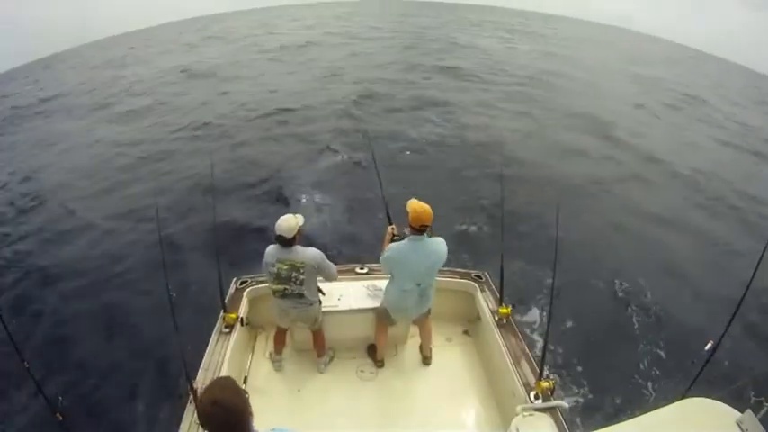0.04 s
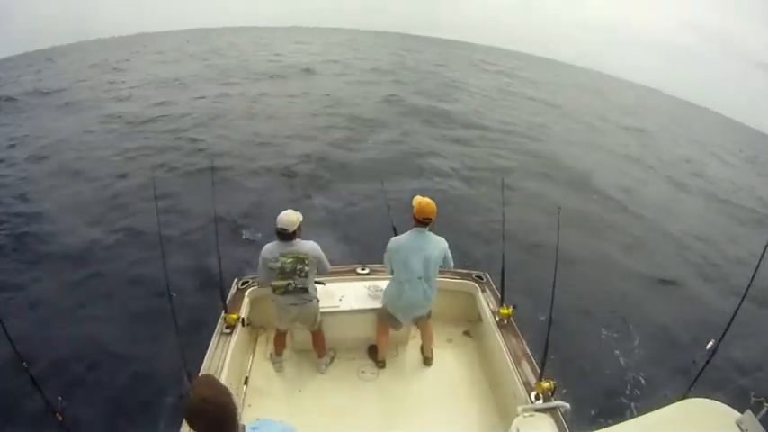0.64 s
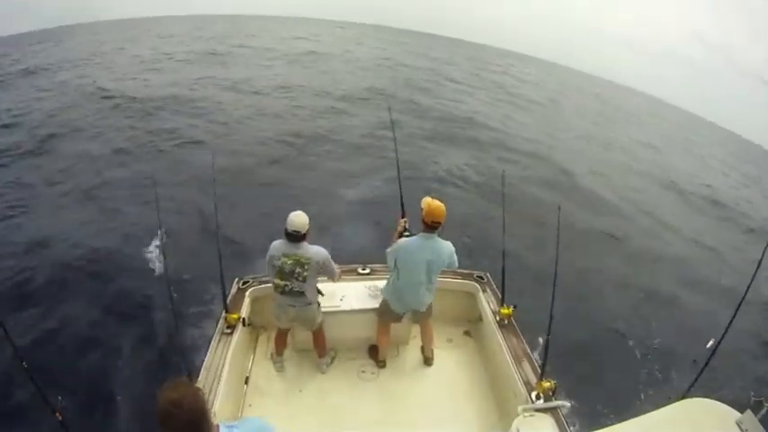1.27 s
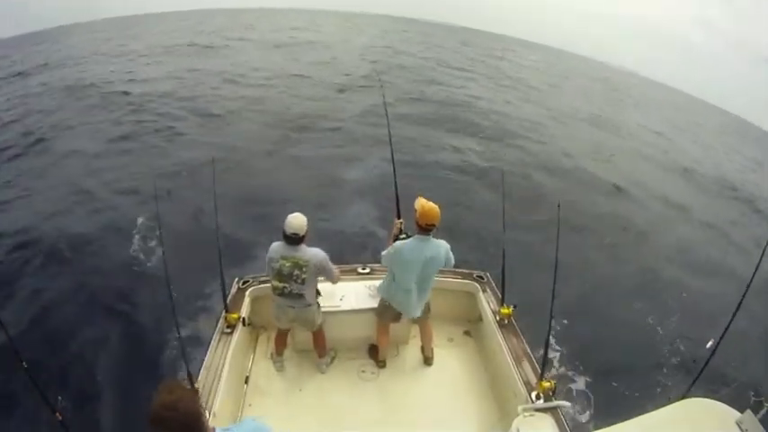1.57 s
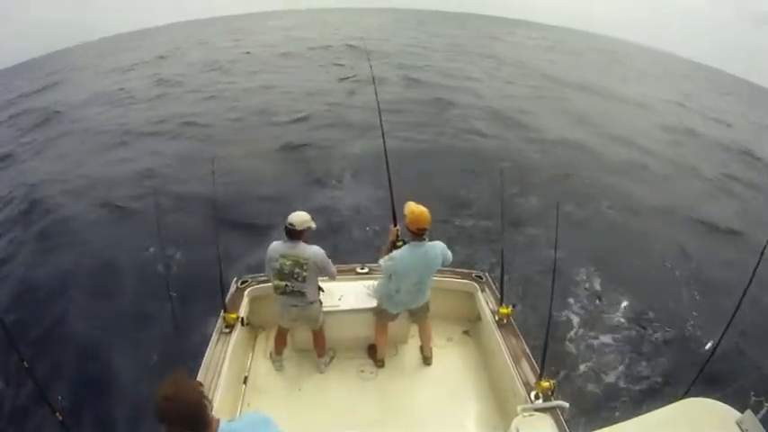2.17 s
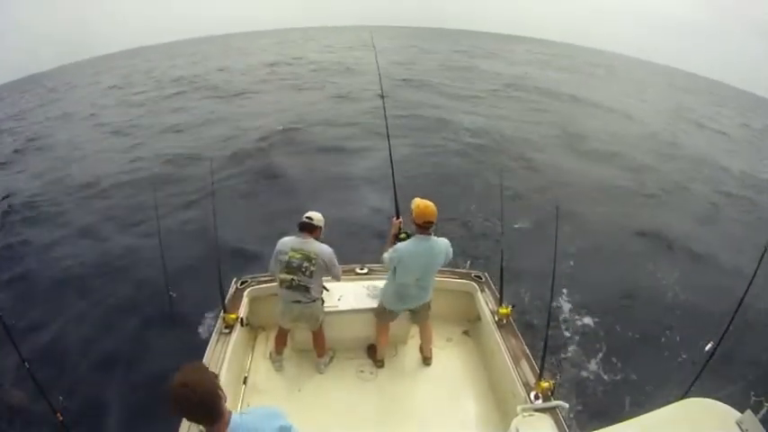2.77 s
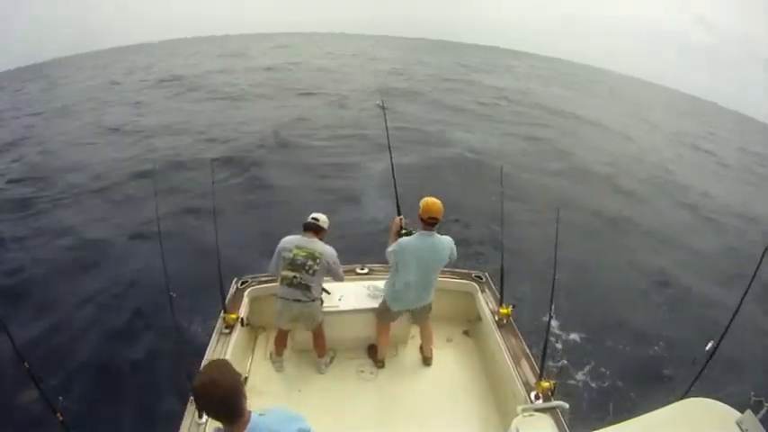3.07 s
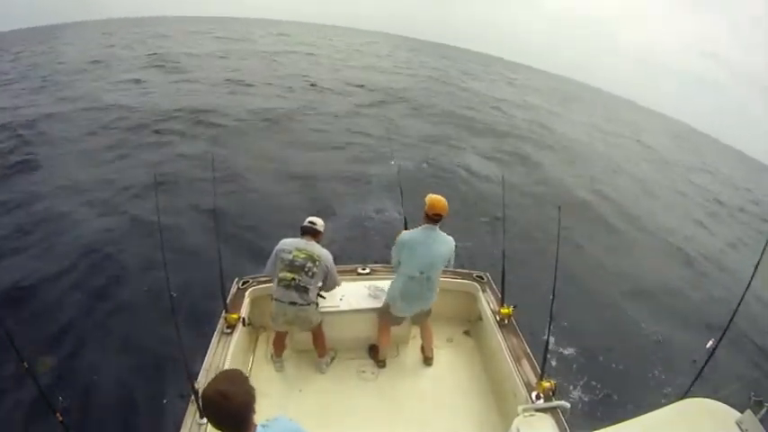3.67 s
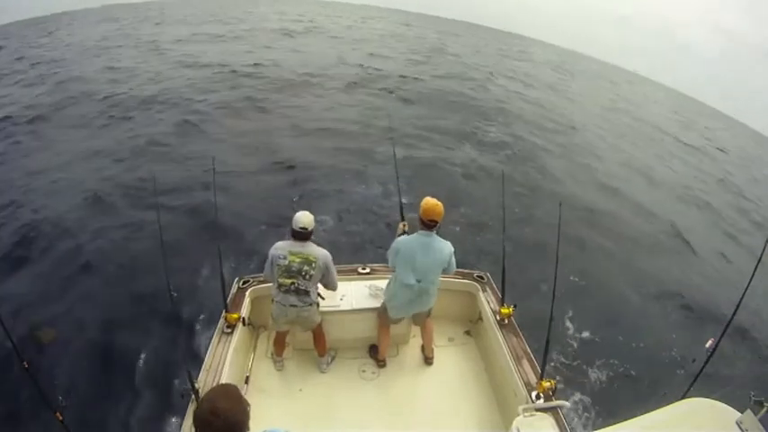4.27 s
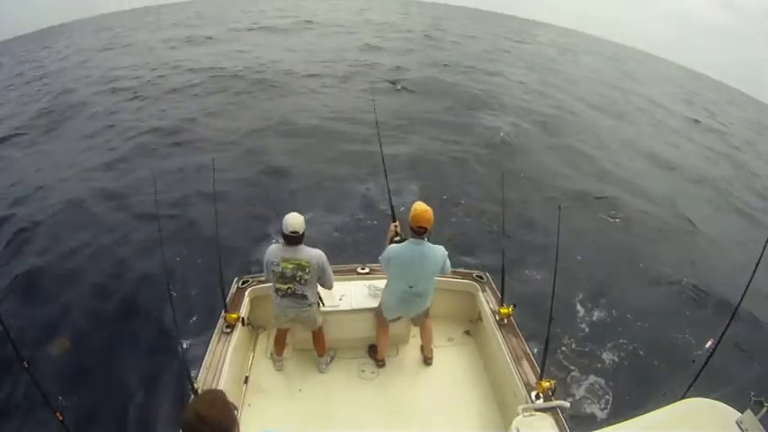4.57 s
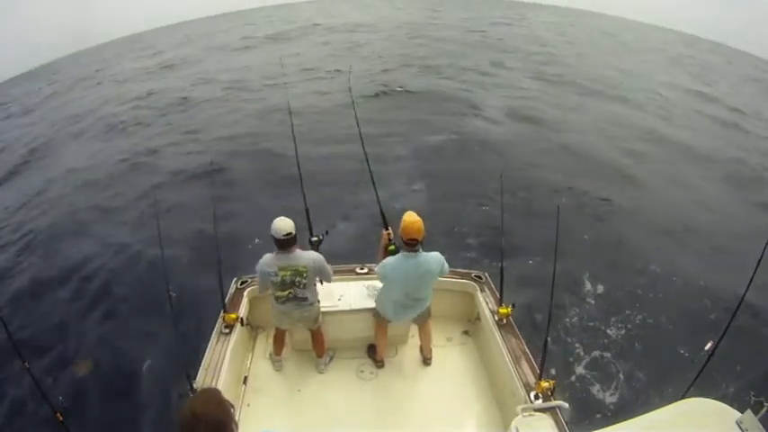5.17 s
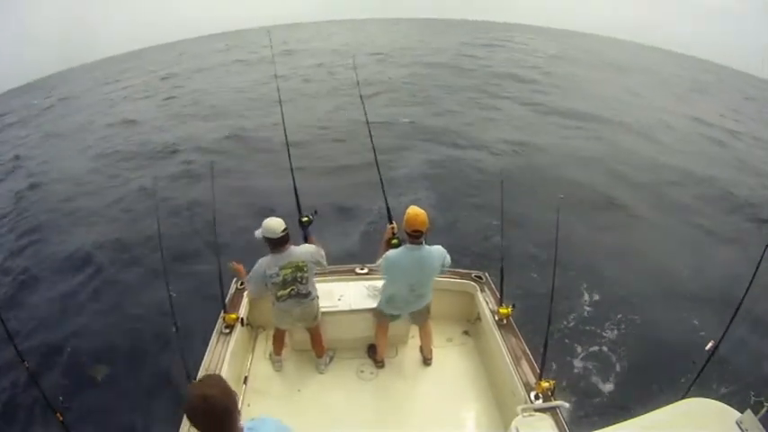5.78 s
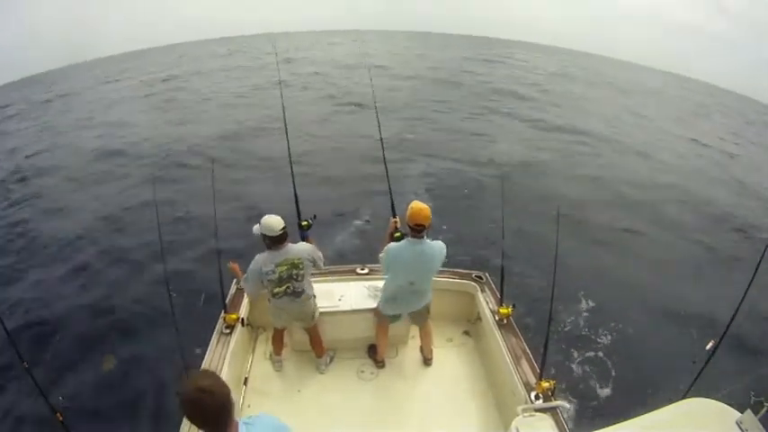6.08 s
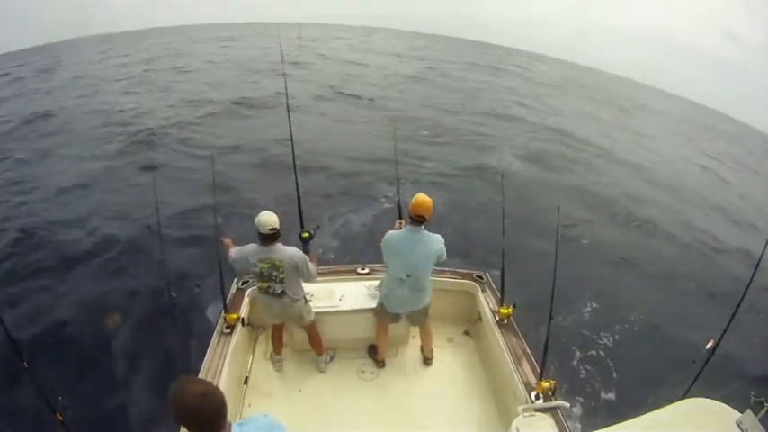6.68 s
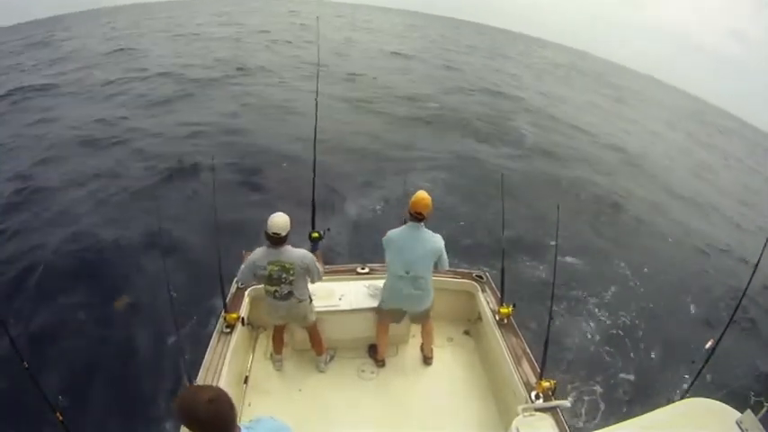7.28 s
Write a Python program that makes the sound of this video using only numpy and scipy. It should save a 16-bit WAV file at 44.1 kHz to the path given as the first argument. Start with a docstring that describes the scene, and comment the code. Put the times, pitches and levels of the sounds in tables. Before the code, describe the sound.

Boat engines drone and throb with small rattles and knocks, over a muffled rush of wind and sea.

```python
"""A fishing boat idling on a swell

Heard from inside a sealed camera housing fixed high on the boat's frame. Two engines drone and
beat slowly against each other; their shaking makes the mount knock, the case tick and a fitting ping.
Wind and sea come through the case as a muffled rush, with hiss, drops of spray and one slop of a wave.
A coarse sample-and-hold adds a thin glassy edge."""
import sys
import numpy as np
from scipy import signal
from scipy.fft import rfft, irfft, next_fast_len
from scipy.io import wavfile
from scipy.ndimage import uniform_filter1d

SR = 44100
rng = np.random.default_rng(int(sys.argv[2]) if len(sys.argv) > 2 else 0)


def to_wav(s):
    """Save 16-bit WAV."""
    ch = np.atleast_2d(s).T  # columns
    pcm = np.round(np.clip(ch, -1, 1) * 32767)  # PCM
    wavfile.write(sys.argv[1], SR, pcm.astype(np.int16))


N = 332053
TIME = np.arange(N) / SR


def gain_of(db):
    """Turns decibels into a multiplier."""
    return 10 ** (np.asarray(db) / 20)


def evened(x):
    """Scales x to an average (rms) level of 1."""
    return x / np.sqrt(np.mean(x ** 2) + 1e-20)


def coloured(x, tone):
    """Filters x by a table of frequencies and levels, then evens it."""
    hz, db = np.transpose(tone)
    size = next_fast_len(N, True)
    f = np.fft.rfftfreq(size, 1 / SR)
    gain = gain_of(np.interp(np.log(f + 1), np.log(hz), db))
    return evened(irfft(rfft(x, size) * gain, size)[:N])


def steadied(x, size):
    """Holds the power of x near 1 over stretches of `size` samples."""
    power = uniform_filter1d(uniform_filter1d(x ** 2, size), size)
    return x / np.sqrt(abs(power) + 1e-12)


def add(mix, s, sound):
    """Mixes a sound in at s seconds."""
    part = mix[max(round(s * SR), 0):][:len(sound)]
    part += sound[:len(part)]


def swells(rows):
    """Adds up bell-shaped bumps, one per row, into a curve for each level column."""
    s, width, *heights = np.transpose(rows)
    t = TIME[::100]
    bells = np.exp(-(2 * (t - s[:, None]) / width[:, None]) ** 2)
    return [np.interp(TIME, t, h @ bells) for h in heights]


def spell(start, end, rise_s, fall_s):
    """Fades in before start, holds until end, then fades out."""
    return np.exp(np.minimum(TIME - start, 0) / rise_s - np.maximum(TIME - end, 0) / fall_s)


def drift(step_s):
    """A smooth random wobble that changes about once per step."""
    t = TIME[::100]
    f = np.fft.rfftfreq(len(t), t[1])
    keep_slow = np.exp(-(2 * f * step_s) ** 2) * (f > 0)
    wobble = irfft(rfft(rng.standard_normal(len(t))) * keep_slow, len(t))
    return np.interp(TIME, t, evened(wobble))


def strike(modes, levels_db, splits_hz, scrape, scrape_s, rise_cycles):
    """A tap and brief scrape ring a part's modes (its own notes); each pitch band gets its own level."""
    t = np.arange(SR // 10) / SR
    hz, db, ring_s = np.transpose(modes)[:, :, None]
    detune = 1 + 0.0091 * rng.standard_normal(hz.shape)
    rings = gain_of(db - 60 * t / ring_s) * np.sin(2 * np.pi * hz * detune * t)
    rings *= 1 - np.exp(-t * hz / rise_cycles)  # low notes take longer to build
    force = rng.standard_normal(len(t)) * np.exp(-t / scrape_s)
    force *= scrape / np.linalg.norm(force)
    force[0] += 1  # the tap
    rings = signal.fftconvolve(force[None], rings, axes=1)[:, :len(t)]
    band = np.searchsorted(splits_hz, hz[:, 0])
    return sum(gain_of(level) * evened(rings[band == k].sum(0)) for k, level in enumerate(levels_db))


# Surges as the engines fall into step: (middle [s], width [s], drone lift [dB], boom lift [dB])
ENGINE_SURGES = [(0.15, 0.35, 11, 9), (0.81, 0.46, 10, 8.5), (1.7, 0.56, 6, 10), (2.44, 0.43, 12, 9),
                 (3.31, 0.5, 11, 8), (3.89, 0.25, 5, 7.5), (4.33, 0.32, 9.5, 10.5), (4.56, 0.1697, 6, 15.5),
                 (4.86, 0.319, -2, 10.5), (5.17, 0.46, 11, 7.5), (6.03, 0.43, 9.5, 9.5),
                 (6.93, 0.53, 11, 10), (7.33, 0.13, 7, -3), (7.5, 0.14, -1.5, 6.5)]
# The deep hum swells and cancels: (middle [s], width [s], change [dB])
HUM_SWELLS = [(0.36, 0.19, 4.5), (0.54, 0.083, -7), (0.77, 0.12, 2.5), (1.21, 0.14, -26), (1.5, 0.24, 6),
              (2.05, 0.17, -4), (2.85, 0.12, -9), (3.72, 0.13, -5), (4.5, 0.13, 2), (4.8, 0.3, -10.5),
              (5.96, 0.24, 10.5), (6.92, 0.22, -17), (7.2, 0.3, 4)]
# Tone of the low throb and of the boom above it: (frequency [Hz], relative level [dB])
THROB_SPECTRUM = [(27, -16), (40, -22.5), (62, 3.5), (84, 7), (102, 5.5), (120, 4), (131, -7), (146, 1),
                  (162, -15.5), (190, -60)]
BOOM_SPECTRUM = [(140, -23.5), (163, -10.5), (174, -5), (198, 3.5), (225, -5), (258, -11.5), (283, -17.5),
                 (305, -28.5), (360, -80.5)]


def engines(turns, other_turns):
    """Tones at multiples of shaft speed: low ones clean, higher ones roughened by wind and exhaust."""
    def harmonic(k, shaft):
        return np.sqrt(2) * np.cos(2 * np.pi * (k * shaft + rng.random()))

    drone_lift, boom_lift = swells(ENGINE_SURGES)
    hum_db = -29 + swells(HUM_SWELLS)[0] + 2 * drift(0.1)
    drone_db = -32 + drone_lift + 2 * drift(0.068)
    throb_db = -31 + 0.42 * boom_lift + 2.4 * drift(0.043)
    boom_db = -41 + 0.93 * boom_lift + 2 * drift(0.043)
    out = gain_of(-42) * harmonic(0.98, turns)
    out += gain_of(hum_db) * harmonic(2, turns)
    out += gain_of(drone_db) * harmonic(3, other_turns)
    for tone, db, rough in (THROB_SPECTRUM, throb_db, 0.6), (BOOM_SPECTRUM, boom_db, 0.46):
        firing = sum(0.43 * harmonic(k, turns) + harmonic(k, other_turns) for k in range(4, 13))
        buffeting = coloured(rng.standard_normal(N), tone)
        blend = (1 - rough) * coloured(firing, tone) + rough * buffeting
        out += gain_of(db) * steadied(blend, size=3000)
    return out


def shaft_turns(speeds_hz=(25.04, 24.595), sag_hz_per_db=0.04, wander_hz=0.45):
    """Counts each engine's turns; the speed wanders and drops a little in a surge."""
    sag_hz = sag_hz_per_db * swells(ENGINE_SURGES)[0]
    return [np.cumsum(hz - sag_hz + wander_hz * drift(0.25)) / SR for hz in speeds_hz]


# The rush before surges lift it: (time [s], hollow body level [dB], upper wash level [dB])
RUSH_LEVELS = [(0, -55.5, -56), (0.6, -55.5, -59), (1.3, -56.5, -59), (2.1, -55.5, -58.5),
               (2.55, -57.5, -55), (2.9, -58, -61.5), (3.4, -57.5, -59), (4.05, -55, -63.5),
               (4.95, -56, -58.5), (5.6, -60, -62), (6.15, -57, -57.5), (6.4, -57.5, -60.5),
               (6.7, -55, -61), (7.5, -59.5, -60.5)]
# Tone of the body, the wash and a steady background: (frequency [Hz], relative level [dB])
BODY_SPECTRUM = [(150, -34.5), (330, -5), (470, -4), (560, -2), (660, 5), (720, -1.5), (820, -6),
                 (930, -33), (1200, -67.5)]
WASH_SPECTRUM = [(700, -5), (1050, 6.5), (1300, -0.5), (1600, -1), (2150, 5), (2600, 1.5), (3100, -24.5),
                 (3600, -7), (4200, -17.5), (6000, -13)]
BACKGROUND_SPECTRUM = [(300, -9), (1500, 1), (3500, 2.5), (4600, -0.5), (6000, -12.5)]


def rush(turns, flutter_db=2):
    """Sea and wind come through the case, fluttering with each turn of an engine."""
    flutter = gain_of(flutter_db * np.cos(2 * np.pi * turns))
    body_db, wash_db = rush_levels()
    out = gain_of(-68) * coloured(rng.standard_normal(N), BACKGROUND_SPECTRUM)
    for db, tone in (body_db + 1, BODY_SPECTRUM), (wash_db, WASH_SPECTRUM):
        out += gain_of(db) * coloured(rng.standard_normal(N) * flutter, tone)
    return out


def rush_levels():
    """Body and wash levels in dB, lifted a little by each surge."""
    s, body_db, wash_db = np.transpose(RUSH_LEVELS)
    lift = swells(ENGINE_SURGES)[1]
    return np.interp(TIME, s, body_db) + 0.19 * lift, np.interp(TIME, s, wash_db) + 0.12 * lift


def water_noise(tone, grain_db=2.5):
    """Noise whose level flickers quickly, so it sounds grainy."""
    flicker = evened(uniform_filter1d(rng.standard_normal(N), size=200))
    return coloured(gain_of(grain_db * flicker) * rng.standard_normal(N), tone)


# Spells of hiss: (start [s], end [s], level [dB])
HISS_SPELLS = [(-0.1, 0.298, -62), (2.81, 3.15, -65), (3.2, 3.52, -64), (3.8, 3.82, -69), (5.928, 6.4, -64),
               (6.45, 6.827, -66.5)]
# Tone of the hiss: (frequency [Hz], relative level [dB])
HISS_SPECTRUM = [(2500, -30), (3600, -16.5), (3850, 1.5), (3980, 7), (4150, -9), (4450, -3), (4650, -2.5),
                 (4900, -2.5), (5280, 0), (5550, -3.5), (6000, -21)]


def spray_hiss(rise_s=0.059, fall_s=0.19):
    """Spray makes a thin hiss that comes and goes."""
    spells = [gain_of(db) * spell(start, end, rise_s, fall_s) for start, end, db in HISS_SPELLS]
    return np.max(spells, axis=0) * water_noise(HISS_SPECTRUM)


# Notes of the mount and the case: (frequency [Hz], relative level [dB], time to fade 60 dB [s])
MOUNT_MODES = [(240.7, 2.5, 0.15), (568, -12.5, 0.15), (655, 6.5, 0.059), (782, 0.5, 0.049),
               (1036, -6.5, 0.058), (1174, -1.5, 0.026), (1760, -1.5, 0.032), (2094, -6, 0.052),
               (2310, 4, 0.02), (2515, -1.5, 0.027), (3470, -15, 0.029)]
CASE_MODES = [(810, 7.5, 0.016), (1309, 9.5, 0.018), (1460, 2.5, 0.016), (2064, -5, 0.017),
              (2533, 2.5, 0.0096), (2700, -15.5, 0.017), (3540, 6, 0.018), (3610, -11, 0.049)]


def chatter(turns, case_share=0.39, spread_db=4):
    """Each engine turn faintly taps the case or the mount, harder when the rush is loud."""
    out = np.zeros(N)
    body_db, wash_db = rush_levels()
    turn_starts = np.flatnonzero(np.diff(np.floor(turns)))
    for i, (late, pick, force) in zip(turn_starts, rng.random((len(turn_starts), 3))):
        if pick < case_share:
            modes, db, split_hz = CASE_MODES, wash_db[i] - 9, 3100
        else:
            modes, db, split_hz = MOUNT_MODES, body_db[i] - 7, 900
        db += spread_db * (2 * force - 1)
        bands_db = (db, db - 10)  # a soft tap barely wakes the high notes
        tap = strike(modes, bands_db, [split_hz], scrape=1, scrape_s=0.0087, rise_cycles=0.23)
        add(out, i / SR + 0.03 * late, tap)
    return out


# Sharp ticks: (time [s], middle ring level [dB], tilt toward the high ring [dB])
CASE_TICKS = [(0.142, -55.5, -10), (0.262, -64, 1), (0.4028, -59, -3), (0.4473, -66, -3),
              (0.5211, -59.5, -8), (0.601, -66.5, 2), (0.888, -68, 14), (1.0328, -67, -6),
              (1.8609, -55.5, -7), (2.1999, -63.5, -12.5), (2.2315, -62, -5.5), (2.603, -59, -4),
              (2.6124, -61.5, -7), (2.6516, -63, 4), (2.6729, -52.5, 8.5), (2.7028, -64.5, -13),
              (2.751, -56.5, 6.5), (2.7899, -55, 6), (2.828, -65.5, -1), (2.8813, -58, 3),
              (2.9284, -53.5, 3), (2.9871, -52.5, 1), (3.0012, -59, -5.5), (3.197, -67, 5),
              (3.4905, -64.5, 0), (4.0634, -58.5, 3), (4.6163, -68.5, -11), (4.9704, -68, -6),
              (4.9866, -66, -11), (5.1436, -59.5, -4), (5.1551, -54, -7), (5.2031, -57.5, -4.5),
              (5.242, -54.5, -4), (5.294, -55, -6), (5.5054, -62, 4), (5.5398, -61, -7),
              (5.7772, -54.5, -5.5), (5.8093, -65, -8), (5.8355, -62, 4), (6.018, -60, 5),
              (6.068, -59.5, 15), (6.1447, -65, -4), (7.427, -65, -10)]


def case_ticks():
    """The case is shaken against its stops and rings very briefly."""
    out = np.zeros(N)
    for s, db, tilt in CASE_TICKS:
        bands_db = (db - 1.5 - tilt, db, db - 3 + 0.26 * tilt)
        tick = strike(CASE_MODES, bands_db, (1750, 3100), scrape=0.63, scrape_s=0.0036, rise_cycles=3.2)
        add(out, s, tick)
    return out


# Dull knocks, before their boost: (time [s], count, body level [dB], bright ring level [dB])
MOUNT_KNOCKS = [(0.446, 1, -49.5, -53), (0.61, 1, -51.5, -57), (0.79, 1, -54, -64), (1.113, 1, -55, -63.5),
                (1.271, 1, -54, -62), (1.843, 1, -51, -64), (2.367, 1, -65, -63), (2.395, 1, -55.5, -59.5),
                (2.527, 1, -40, -56.5), (2.95, 1, -53, -67), (3.222, 1, -56, -66), (3.252, 1, -53.5, -57.5),
                (3.32, 3, -62, -72), (3.779, 3, -54, -67.5), (4.714, 1, -51.5, -61.5),
                (4.753, 3, -46.5, -58), (4.896, 2, -47.5, -63), (5.023, 1, -42, -54),
                (5.098, 1, -46.5, -70), (5.194, 1, -48.5, -63), (6.217, 1, -52.5, -62),
                (6.258, 2, -56, -73), (6.584, 1, -56.5, -70), (6.645, 3, -55, -72)]


def mount_knocks(gap_s=0.039, boost_db=3):
    """The mount hits its stops, once or in a run about one engine turn apart."""
    out = np.zeros(N)
    for s, count, body_db, bright_db in MOUNT_KNOCKS:
        bands_db = (body_db + 2, body_db, bright_db)
        for k in range(round(count)):
            knock = strike(MOUNT_MODES, bands_db, (400, 1500), scrape=0.83, scrape_s=0.01, rise_cycles=3)
            add(out, s + k * gap_s, gain_of(boost_db) * knock)
    return out


# Drops of spray: (time [s], level [dB])
SPRAY_DROPS = [(0.5219, -40), (1.862, -44), (3.0022, -45), (3.9099, -46), (4.473, -38), (4.642, -48),
               (5.7777, -43)]


def spray_drops(fade_s=0.0065):
    """Each drop hits the case with a tiny burst of bright noise."""
    out = np.zeros(N)
    t = np.arange(SR // 40) / SR
    for s, db in SPRAY_DROPS:
        bright_noise = np.diff(rng.standard_normal(len(t) + 1))
        add(out, s, gain_of(db) * bright_noise * np.exp(-t / fade_s))
    return out


# Notes of the fitting: (frequency [Hz], relative level [dB], time to fade 60 dB [s])
FITTING_MODES = [(1794, -20, 0.027), (2090, 13, 0.027), (2218.7, -6, 0.059)]
# Its pings: (time [s], level [dB])
FITTING_PINGS = [(3.371, -62), (3.401, -61), (4.021, -56), (4.0498, -44.5), (4.102, -46.5), (6.185, -61.5)]


def fitting_pings():
    """A loose metal fitting rings when it is shaken against its stop."""
    out = np.zeros(N)
    for s, db in FITTING_PINGS:
        add(out, s, strike(FITTING_MODES, [db], [], scrape=0.2, scrape_s=0.0022, rise_cycles=2))
    return out


# Tone of the slop: (frequency [Hz], relative level [dB])
SLOP_SPECTRUM = [(300, 0), (700, 3), (1500, 2), (2500, 7), (3500, -0.5), (4600, -3), (6000, -13.5)]


def wave_slop(at_s=4.478, level_db=-46):
    """One wave slops against the hull in a short splash."""
    return gain_of(level_db) * spell(at_s, at_s, rise_s=0.016, fall_s=0.035) * water_noise(SLOP_SPECTRUM)


# Gaps between the pitches at which the housing wall rings: (middle [Hz], width [Hz], change [dB])
WALL_DIPS = [(413, 120, -3), (925, 71, -9), (1600, 160, -1.5), (3080, 220, -3.5), (3250, 130, -8),
             (4600, 780, -5)]


def through_wall(x):
    """The housing wall weakens the pitches that fall in its gaps."""
    size = next_fast_len(N, True)
    f = np.fft.rfftfreq(size, 1 / SR)
    gaps_db = sum(db * np.exp(-(2 * (f - hz) / width) ** 2) for hz, width, db in WALL_DIPS)
    return irfft(rfft(x, size) * gain_of(gaps_db), size)[:N]


def scene():
    """Everything that reaches the microphone inside the housing, in one channel."""
    turns, other_turns = shaft_turns()
    drone = engines(turns, other_turns)
    sea = rush(other_turns) + spray_hiss() + wave_slop() + spray_drops()
    rattle = mount_knocks() + case_ticks() + fitting_pings() + chatter(other_turns)
    return (drone + sea + through_wall(rattle))[None]


def record(dry):
    """Holding each sample at a low rate mirrors the sound faintly into the treble: the glassy edge."""
    def low_pass(x, hz):
        taps = signal.firwin(181, hz, window=("kaiser", 9), fs=SR)
        return signal.oaconvolve(x, taps[None], "same")

    hold_hz = 12000
    slow = signal.resample_poly(low_pass(dry, hz=6020), hold_hz, SR, axis=1)
    steps = np.repeat(slow, 4, axis=1)
    held = signal.resample_poly(steps, SR, 4 * hold_hz, axis=1)[:, :N]
    return low_pass(held, hz=15200)


dry = scene()
out = record(dry)
to_wav(out)
```